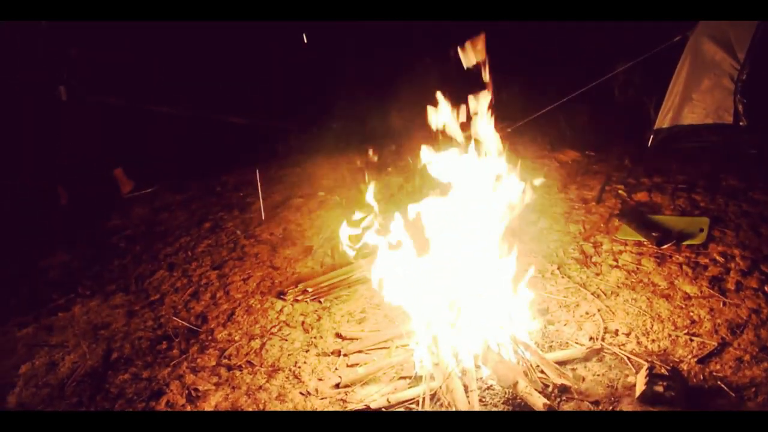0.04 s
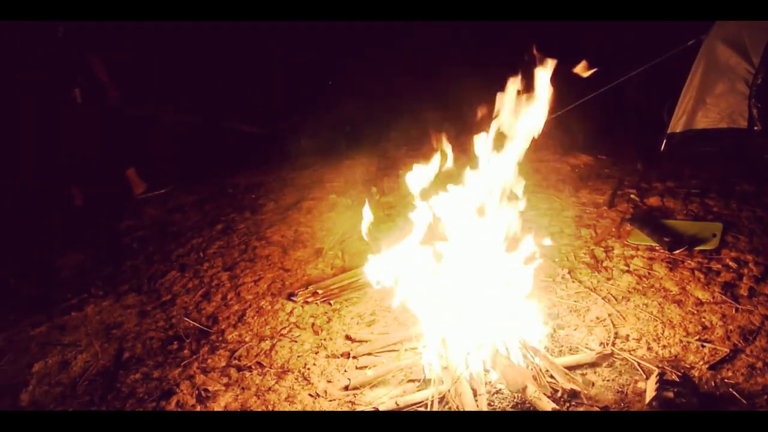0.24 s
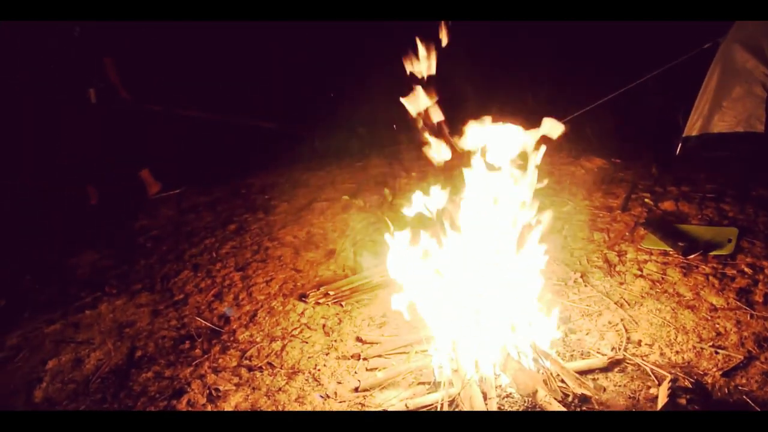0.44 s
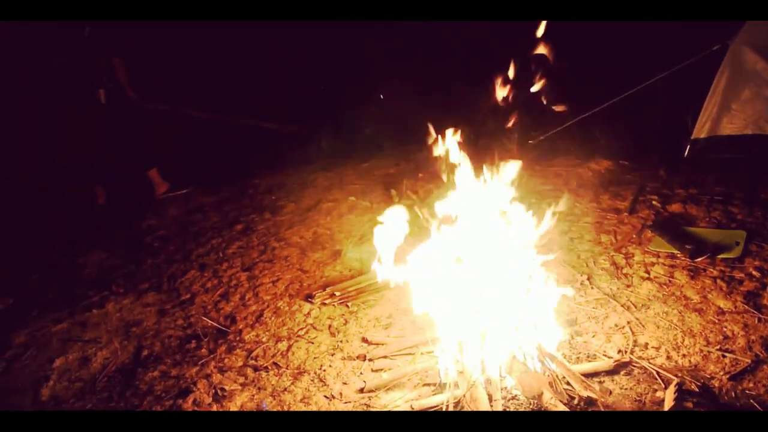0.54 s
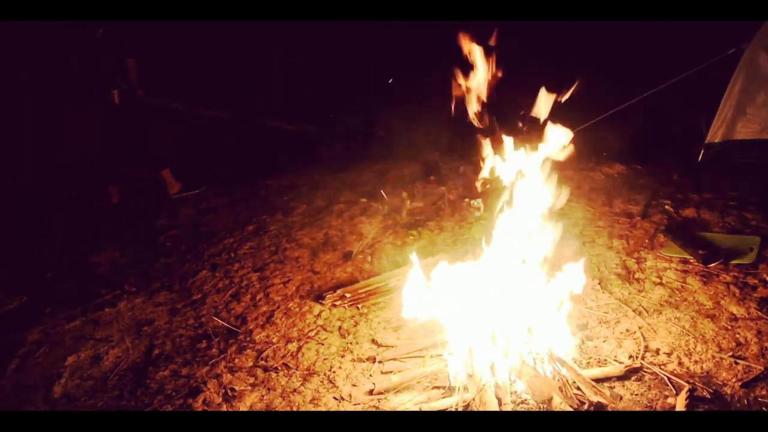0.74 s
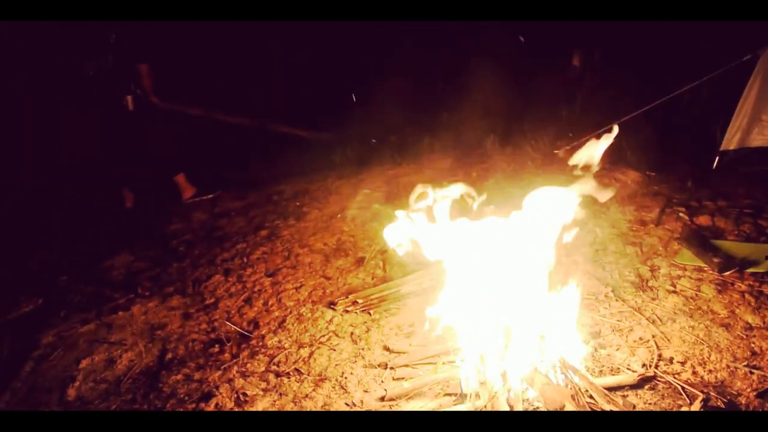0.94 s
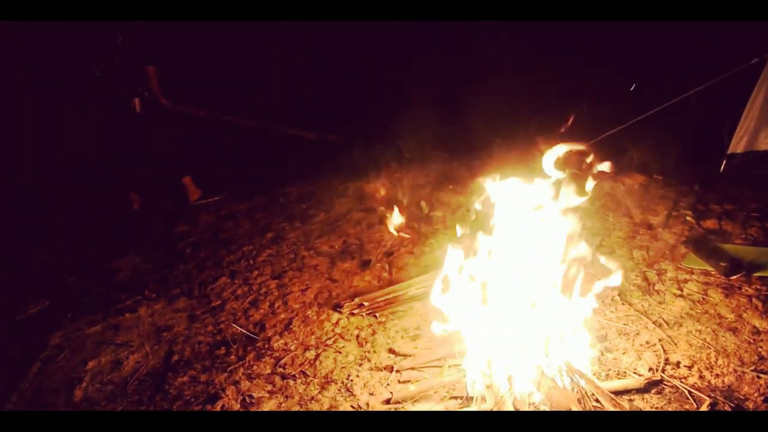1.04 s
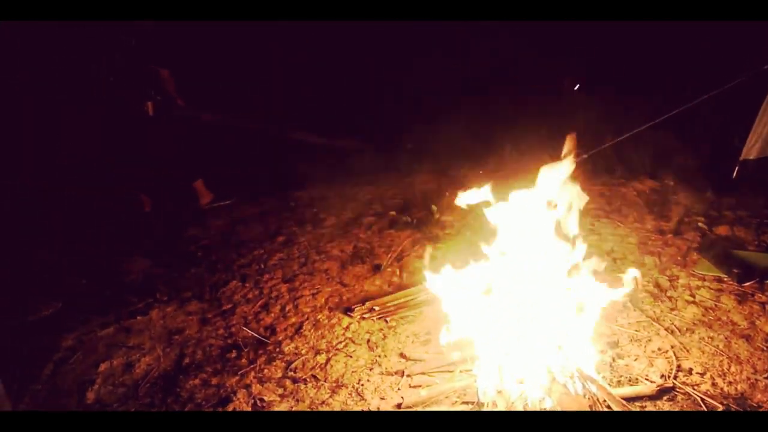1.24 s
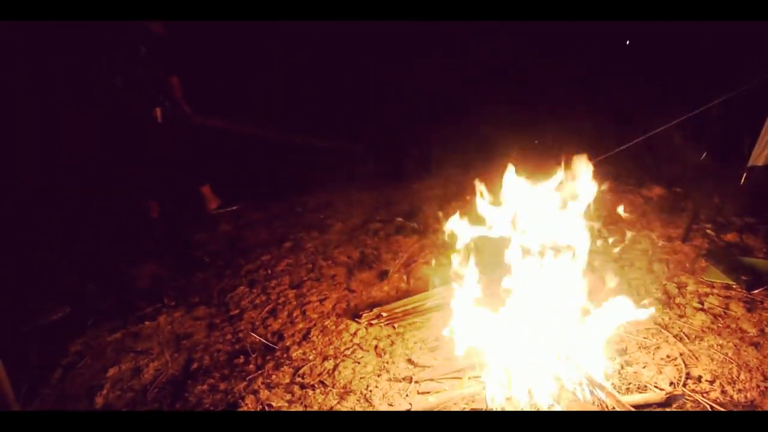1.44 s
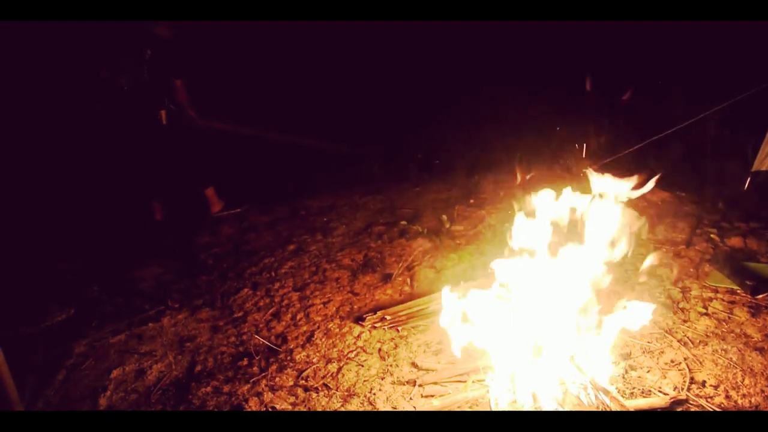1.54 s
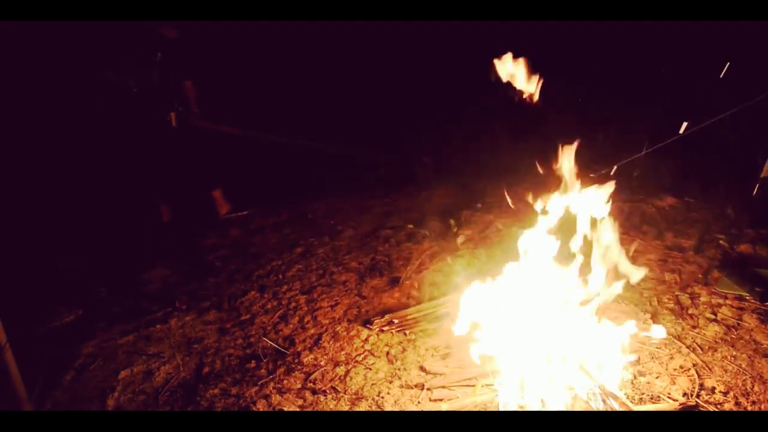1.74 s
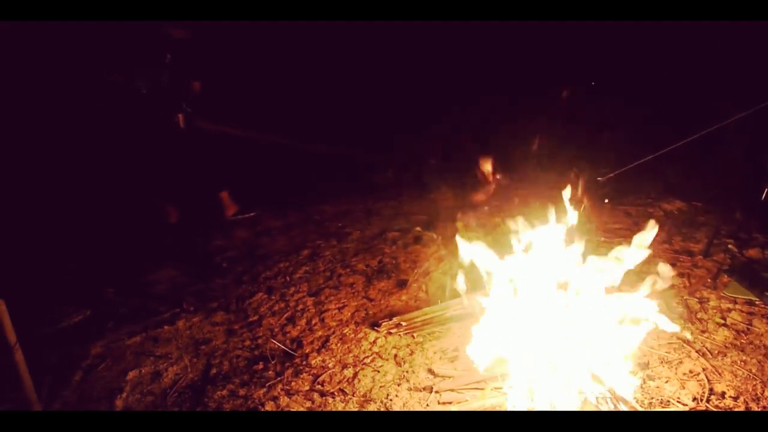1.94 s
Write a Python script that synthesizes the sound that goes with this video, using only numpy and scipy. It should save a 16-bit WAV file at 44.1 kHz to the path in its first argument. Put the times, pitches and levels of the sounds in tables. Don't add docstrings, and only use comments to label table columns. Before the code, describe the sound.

A campfire crackles close by in the open night, with soft flame flutter, airy hiss and tiny ember ticks throughout. A small snap at 0.07 s, then a loud woody crack at 0.2 s releases a bright steam rush fading by about 0.5 s; a second, shorter burst hits at 0.4 s. Dry ticks and sparks follow, with a piercing snap at 1.53 s. Faint crickets chirp and trill near 5 kHz.

```python
import sys
import numpy as np
from scipy import signal
from scipy.fft import rfft, irfft, next_fast_len
from scipy.io import wavfile
from scipy.ndimage import uniform_filter1d, map_coordinates

SR = 44100
rng = np.random.default_rng(int(sys.argv[2]) if len(sys.argv) > 2 else 0)


def bounce(signal):
    frames = np.transpose(np.atleast_2d(signal))
    limited = np.clip(frames, -1, 1)
    pcm = np.round(limited * 32767).astype(np.int16)
    wavfile.write(sys.argv[1], SR, pcm)


def field_ratio(decibels):
    return 10 ** (np.asarray(decibels, dtype=float) / 20)


N = 88200


def unit(x):
    return x / np.sqrt(np.mean(x ** 2) + 1e-20)


def along(points, hz):
    f, v = np.transpose(points)
    return np.interp(np.log(hz + 1), np.log(f + 1), v)


def over_time(points):
    s, v = np.transpose(points)
    return np.interp(np.arange(N) / SR, s, v)


def wobble(rate_hz):
    knots = rng.standard_normal(int(N * rate_hz / SR) + 4)
    return map_coordinates(knots, [np.arange(N) * rate_hz / SR])


def filtered(x, response):
    n = x.shape[-1]
    m = next_fast_len(2 * n)
    return irfft(rfft(x, m) * response(np.fft.rfftfreq(m, 1 / SR)), m)[..., :n]


def paired(pair, spectrum, alike):
    def mid_and_side(hz):
        turn = np.arccos(np.clip(along(alike, hz), -1, 1)) / 2
        return field_ratio(along(spectrum, hz)) * [np.cos(turn), np.sin(turn)]
    mid, side = filtered(pair, mid_and_side)
    return np.array([mid + side, mid - side])


def rush(spectrum, alike, patchy_db):
    z = signal.stft(rng.standard_normal((2, N)), nperseg=512)[2]
    field = rng.standard_normal(z.shape[1:])
    field = uniform_filter1d(uniform_filter1d(field, 6, 0), 8, 1)
    pair = signal.istft(z * field_ratio(patchy_db * unit(field)), nperseg=512)[1][:, :N]
    return unit(paired(pair, [(7.1, -120)] + list(spectrum) + [(21000, -120)], alike))


def add(out, s, x):
    i = round(s * SR)
    out[:, i:i + x.shape[1]] += x[:, :out.shape[1] - i]


# start_s, crack_db, t60_s, top_hz
BURSTS = [
    (0.1996, -1, 0.0078, 14000),
    (0.2816, -18, 0.0067, 14000),
    (0.4009, -9.5, 0.016, 8900),
    (0.4475, -31, 0.0078, 4000),
]
# start_s, level_db, pitch_hz, t60_s
WOOD_MODES = [(0.1997, 1, 1860, 0.0078), (0.1992, -5, 4800, 0.0052), (0.2004, -9, 2230, 0.025),
              (0.2025, -5.5, 993, 0.022), (0.2007, -3, 274, 0.023), (.202, -16, 627, 0.061),
              (.216, -8.5, 760, 0.019), (.281, -32, 1250, 0.0079), (.2835, -10.5, 685, 0.023),
              (.287, -17, 545, 0.031), (0.283, -23, 333, 0.088), (0.4006, -0.5, 1173, 0.0095),
              (0.4006, 5.5, 2970, 0.0019), (.402, -17, 756, 0.03), (0.4, -17.5, 290, 0.014),
              (.4484, -13, 1070, 0.011), (.4484, -18, 3150, 0.0075)]
# pitch_hz, level_db (per Hz)
JET = [(71, -55), (120, -17), (327, -8.5), (493, -10), (592, -7.5), (2380, -3.5), (6110, -3), (10800, -0.5),
       (16000, -8)]
# pitch_hz, likeness (-1 to 1)
JET_ALIKE = [(60, 0.8), (240, 0.93), (950, 0.7), (3000, 0.15), (6000, -0.1), (15000, -0.05)]
BURST_LAG_S, CREAK_DB, CREAK_S = 0.0008, -37, 0.0014
SWELL_CYCLES, ROUGH_RAD = 0.63, 0.045


def log():
    out, t = np.zeros((2, N)), np.arange(SR // 8) / SR
    lead = t[:SR // 100]
    for s, db, t60, top_hz in BURSTS:
        puff = unit(paired(rng.standard_normal((2, len(t))), JET, JET_ALIKE))
        crack = filtered(puff, lambda f: 1 / (1 + (f / top_hz) ** 4))
        add(out, s + BURST_LAG_S, field_ratio(db - 60 * t / t60) * crack)
        creak = np.exp(-lead[::-1] / CREAK_S) * crack[:, -len(lead):]
        add(out, s - lead[-1], field_ratio(db + CREAK_DB) * creak)
    for s, db, hz, t60 in WOOD_MODES:
        swell = 1 - np.exp(-t * hz / SWELL_CYCLES)
        jitter = ROUGH_RAD * np.cumsum(rng.standard_normal(len(t)))
        ring = field_ratio(db - 60 * t / t60) * swell * np.sin(2 * np.pi * hz * t + jitter)
        add(out, s, np.ones((2, 1)) * ring)
    return filtered(out, lambda f: (1j * f / (120 + 1j * f)) ** 2)


# start_s, level_db, hold_s, t60_s, treble_db
VENTS = [
    (0.203, -13, 0.068, 0.48, -3.9),
    (0.397, -25.5, 0.054, 0.15, -25),
]
VENT_ATTACK_S, DULLS = 0.0016, 1.06


def steam():
    t, level, top = np.arange(N) / SR, 0, 0
    jet = rush(JET, JET_ALIKE, patchy_db=0.3)
    for s, db, hold, t60, treble_db in VENTS:
        opening = 1 - np.exp(-np.clip(t - s, 0, None) / VENT_ATTACK_S)
        fall_db = -60 * np.clip(t - s - hold, 0, None) / t60
        level = level + opening * field_ratio(db + fall_db)
        top = top + opening * field_ratio(db + treble_db + DULLS * fall_db)
    body = filtered(jet, lambda f: 1 / (1 + (f / 5000) ** 4))
    return field_ratio(0.26 * wobble(51.0)) * (level * body + top * (jet - body))


# start_s, peak_db, pitch_hz, t60_s, sharpness_q
TICKS = [(.0729, -14.5, 4030, 0.0085, 1.6), (.0731, -23.5, 1290, 0.0039, 0.7),
         (.403, -15.5, 2430, .004, 0.49), (.527, -28, 1150, .012, 0.7), (.5332, -21.5, 3900, 0.015, 0.5),
         (.59, -29, 2150, 0.0074, 2), (.627, -29.5, 2170, 0.0049, 1.4), (.841, -34.5, 550, 0.055, 0.97),
         (.875, -27.5, 1600, 0.029, 1.1), (.961, -31.5, 735, 0.058, 1.7), (1.011, -30.5, 780, 0.012, 1.9),
         (1.02, -18.5, 1930, 0.0064, 2.1), (1.0462, -27, 1300, .006, 0.54), (1.079, -37.5, 666, 0.015, 1.5),
         (1.292, -37, 3400, .005, 1), (1.367, -29.5, 1720, 0.016, 0.89), (1.387, -27.5, 1840, 0.012, 0.99),
         (1.4271, -16.5, 2520, 0.018, 0.63), (1.4365, -22.5, 1630, 0.018, 0.8),
         (1.5135, -23.5, 720, 0.022, 0.95), (1.5139, -16, 3000, 0.023, 0.28),
         (1.6277, -25, 4200, 0.005, 2.3), (1.6292, -26, 2120, 0.0053, 1.6), (1.63, -20.5, 3300, 0.008, 3.4),
         (1.6315, -23.5, 3450, 0.01, 4.2), (1.63, -30.5, 1130, 0.015, 2.5),
         (1.6347, -20, 4800, 0.0054, 1.2), (1.642, -26, 2700, 0.008, 0.89), (1.8985, -34, 1100, 0.014, 1.2),
         (.79, -39, 180, 0.059, 2.6), (.845, -40, 305, 0.097, 1.5), (1.01, -40, 120, 0.067, 0.81),
         (1.04, -40, 197, 0.044, 1.6), (1.215, -39.5, 203, 0.063, 1.3), (1.87, -44.5, 110, 0.09, 0.92)]
# start_s, peak_db, pitch_hz, t60_s, sharpness_q
SPARKS = [(0.544, -13.5, 6500, 0.005, 1.3), (0.6004, -15, 8650, 0.0058, 0.64),
          (0.6111, -16, 9300, 0.0036, .6), (0.8141, -22, 13500, 0.0056, 1.3),
          (.9847, -23, 10100, 0.006, 1.8), (1.0202, -20, 8440, 0.007, 7.6), (1.0757, -22, 11500, 0.005, .8),
          (1.2925, -19, 9890, 0.005, 1.1), (1.3872, -21, 10600, 0.0066, 1), (1.4272, -30, 7500, .005, 0.84),
          (1.5145, -25, 8500, 0.009, .7), (1.5299, -5, 12250, 0.006, 1.53),
          (1.5432, -22, 13900, 0.008, 2.6), (1.5622, -20, 13000, 0.0088, 1.1),
          (1.8751, -19.5, 11900, 0.0063, 1.5), (1.8982, -16.5, 11000, 0.004, 1.1),
          (1.8992, -21.5, 7900, 0.0046, 2.3), (1.9794, -21, 11200, 0.005, 1.3)]
SNAP_LAG_S, SPIKE = 0.0011, 3.5
PORT_LAG = 2
SKIRT_DB = -19


def snaps(rows):
    out, t = np.zeros((2, N)), np.arange(SR // 20) / SR
    for s, db, hz, t60, q in rows:
        noise = unit(paired(rng.standard_normal((2, len(t))), [(1, 0)], JET_ALIKE))
        puff = noise * field_ratio(-60 * t / t60) * (1 - np.exp(-t / 0.0005))
        puff[[0, 1], [8, 8 + rng.integers(-PORT_LAG, PORT_LAG + 1)]] += SPIKE

        def twig(f):
            band = 1j * f * hz / q / (hz * hz - f * f + 1j * f * hz / q)
            skirt = 1j * f * 3 * hz / (hz / 3 + 1j * f) / (3 * hz + 1j * f)
            return band ** 2 + field_ratio(SKIRT_DB) * skirt

        ring = filtered(puff, twig)
        add(out, s + SNAP_LAG_S, field_ratio(db) * ring / np.abs(ring.mean(axis=0)).max())
    return out


# pitch_hz, level_db (per Hz)
FLAME = [(15, -41), (25, -13.5), (139, -8), (175, -7), (206, -6.5), (325, -10), (790, -8.5), (913, -10.5),
         (3500, -12), (4550, -32), (7700, -120)]
# pitch_hz, level_db (per Hz)
HISS = [(2500, -18), (4000, -3), (6500, -5.5), (8500, -4.5), (10600, 3.5), (13000, -4), (16000, -15.5)]
# pitch_hz, likeness (-1 to 1)
ALIKE = [(60, 0.85), (240, 0.52), (950, 0.25), (3770, -0.021), (15000, -0.041)]
# start_s, level_db
DRAUGHT = [(0, 1), (.5, 1.5), (.8, 0), (1.05, 0.15), (1.5, 1.34), (1.75, 0.3), (2, 0.5)]
FLAME_DB, HISS_DB, EMBER_DB, EMBERS = -45, -38, -46.5, 260


def flames():
    flutter_db = FLAME_DB + 1.1 * wobble(7.68) + 0.26 * wobble(24.6)
    flutter = field_ratio(flutter_db) * rush(FLAME, ALIKE, patchy_db=0.77)
    hiss = field_ratio(HISS_DB + 1.3 * wobble(13.23)) * rush(HISS, ALIKE, patchy_db=0.25)
    when, loud, pitch, length = rng.random((4, EMBERS))
    ember_db = EMBER_DB - 4.5 * np.log(loud + 0.07)
    sharpness_q = np.full(EMBERS, 0.58)
    embers = np.c_[when * 1.98, ember_db, 700 * 18 ** pitch, 0.004 + 0.008 * length, sharpness_q]
    return field_ratio(over_time(DRAUGHT)) * (flutter + hiss + snaps(embers))


# start_s,
# length_s, level_db, pitch_hz, fall_hz
NOTES = [(0.101, 0.054, -39, 5020, 102), (.575, 0.046, -43.5, 4900, 26), (.615, 0.32, -47.5, 4830, 51),
         (.68, 0.007, -45, 4800, 22), (0.634, .014, -39, 4800, 52), (0.758, 0.018, -38, 4950, 200),
         (0.788, 0.012, -37, 4800, -50), (0.815, 0.012, -40.5, 4720, 20), (0.86, 0.039, -36, 4820, 27),
         (0.903, 0.016, -35.5, 4790, 22), (1.068, 0.011, -42, 4950, 100), (1.038, .009, -44, 4950, 150),
         (1.05, .009, -44, 4800, -150), (1.083, .004, -42, 4950, 50), (1.19, .012, -43, 4950, 100),
         (1.208, .018, -42, 5250, 650), (1.232, .012, -43, 4900, -300), (1.29, .045, -45, 4720, 50),
         (1.439, 0.02, -41, 5060, 750), (1.485, 0.016, -38, 5220, 900), (1.699, .014, -45, 4880, 250),
         (1.724, 0.02, -39, 5200, 900), (1.734, .018, -43, 5430, 750), (1.754, .013, -44, 4900, -500),
         (1.766, 0.023, -40, 5330, 1030), (1.955, 0.016, -38, 5250, 154), (1.976, .008, -43, 4900, 100)]
NEAR_LEFT_DB, BLUR_RAD = 0.5, 0.03


def near_cricket():
    out = np.zeros((2, N))
    tremble = field_ratio(1.5 * np.array([wobble(120), wobble(120)]))
    port_phase = np.array([[np.pi / 4], [-np.pi / 4]])
    for s, length, db, hz, fall_hz in NOTES:
        u = np.arange(round(length * SR)) / (length * SR)
        turn = 2 * np.pi * np.cumsum(hz - fall_hz * u ** 1.2) / SR
        jitter = np.cumsum(rng.standard_normal((2, len(u))), axis=1)
        phase = turn + port_phase + BLUR_RAD * (fall_hz > 300) * jitter
        add(out, s, field_ratio(db + 2.5) * np.sin(np.pi * u) ** 0.3 * np.sin(phase))
    return out * tremble * field_ratio([[NEAR_LEFT_DB], [-NEAR_LEFT_DB]])


# start_s, level_db
CHORUS = [(0, -46.5), (.06, -50.5), (.12, -45), (.19, -45), (.55, -48), (.75, -53), (.9, -54), (.95, -50),
          (1.06, -40.5), (1.12, -47), (1.23, -42), (1.36, -47.5), (1.5, -41), (1.62, -46), (1.68, -48),
          (1.75, -46.5), (1.86, -50.5), (1.96, -44)]
CHORUS_HZ, SHARPENS_HZ_PER_DB, CRICKET_WIDTH_HZ, CRICKET_DB = 4900, 22.5, 810, 2.5
STROKES_HZ, STROKE_DEPTH_DB = 40, -1.5


def crickets():
    level_db = over_time(CHORUS)
    pitch = CHORUS_HZ + SHARPENS_HZ_PER_DB * (level_db - level_db.mean())
    turn = 2 * np.pi * np.cumsum(pitch) / SR
    out = np.zeros((2, N))
    for side in out:
        strokes = np.cos(2 * np.pi * np.cumsum(STROKES_HZ * (1 + 0.16 * wobble(2))) / SR)
        noise = rng.standard_normal((2, N))
        spread = filtered(noise, lambda f: 1 / (1 + (2 * f / CRICKET_WIDTH_HZ) ** 4))
        trill = spread[0] * np.cos(turn) + spread[1] * np.sin(turn)
        side += unit(field_ratio(STROKE_DEPTH_DB * strokes) * trill)
    return field_ratio(level_db + CRICKET_DB) * out


def scene():
    fire = log() + steam() + snaps(TICKS) + snaps(SPARKS) + flames()
    return fire + near_cricket() + crickets()


def top_cut(x):
    return signal.sosfilt(signal.butter(12, 16390, fs=SR, output="sos"), x)


# pitch_hz, left_over_right_db
LEFT = [(100, 1), (1000, 0.5), (4000, 1.5), (12000, 3.5)]
DRIVE_DB, TOP_HZ = 0.62, 15900
CEILING, DUCK, AHEAD_S, SMOOTH_S = 0.6, 0.8, 0.015, 0.005


def record(dry):
    ports = np.array([[0.5], [-0.5]])
    x = field_ratio(DRIVE_DB) * filtered(dry, lambda f: field_ratio(along(LEFT, f) * ports) * (f < TOP_HZ))
    first_peak_s = np.argmax(np.abs(x).max(axis=0) > CEILING) / SR
    early_s = first_peak_s - np.arange(N) / SR
    ahead = (early_s > SMOOTH_S) & (early_s < AHEAD_S)
    x = x * (1 - DUCK * uniform_filter1d(ahead * 1.0, round(SMOOTH_S * SR)))
    rounded = x / (1 + np.abs(x / 1.6) ** 6) ** (1 / 6)
    return top_cut(rounded)


dry = scene()
out = record(dry)
bounce(out)
```